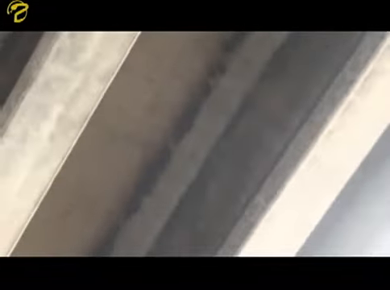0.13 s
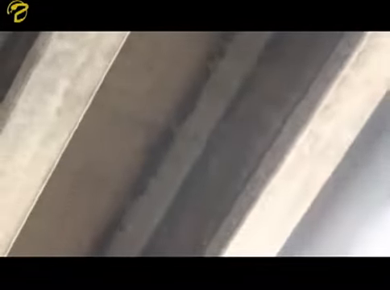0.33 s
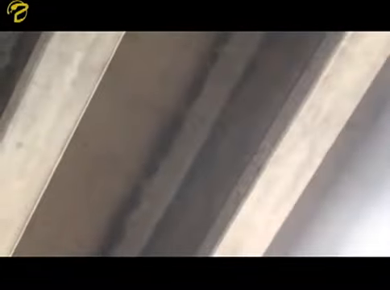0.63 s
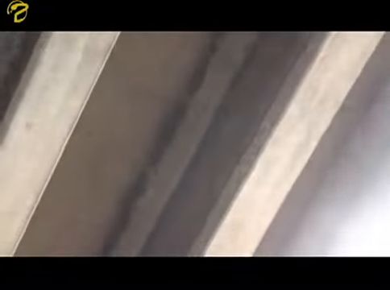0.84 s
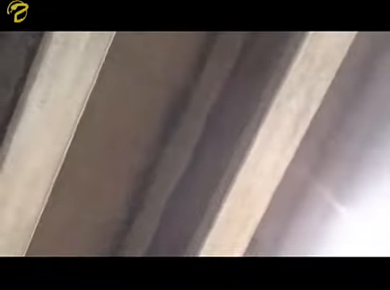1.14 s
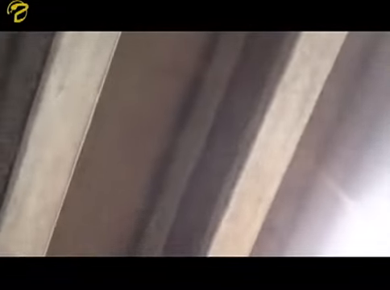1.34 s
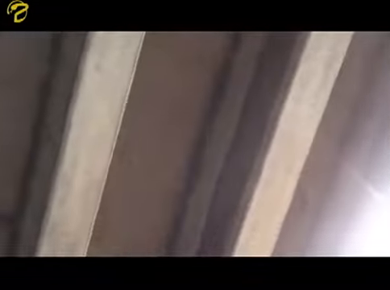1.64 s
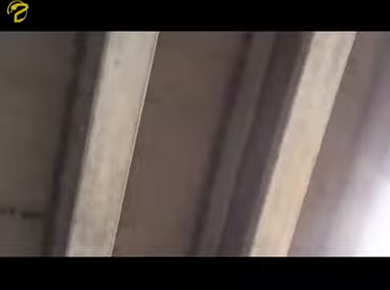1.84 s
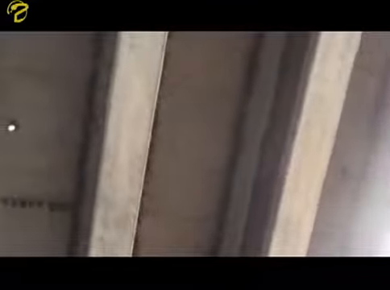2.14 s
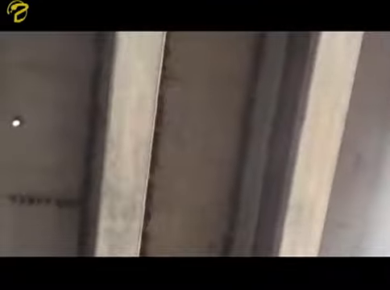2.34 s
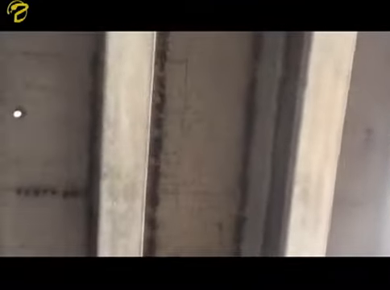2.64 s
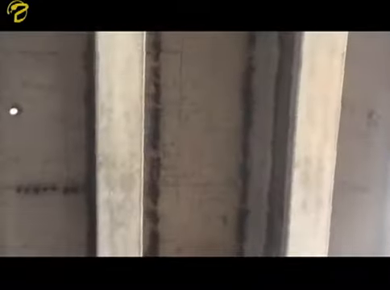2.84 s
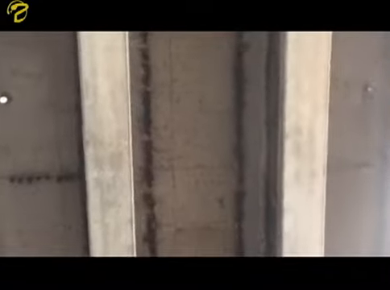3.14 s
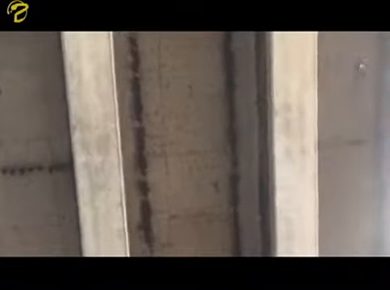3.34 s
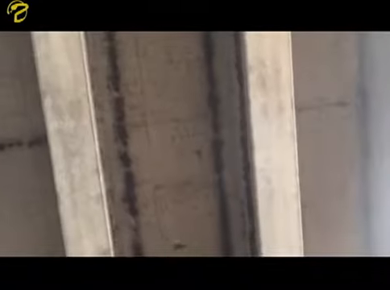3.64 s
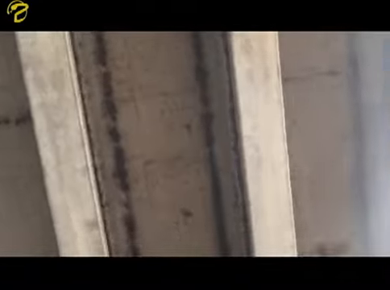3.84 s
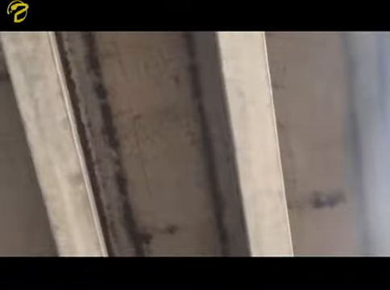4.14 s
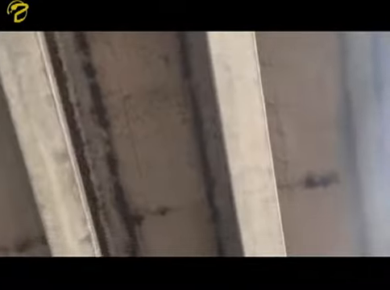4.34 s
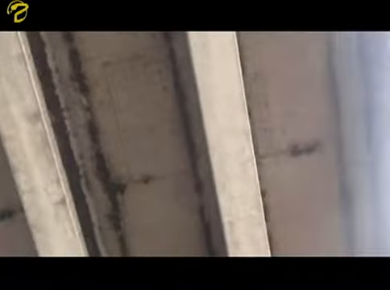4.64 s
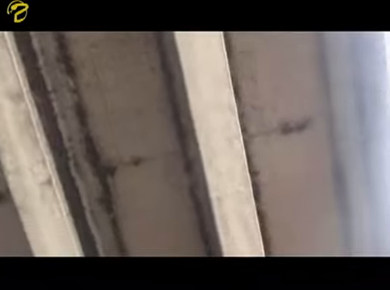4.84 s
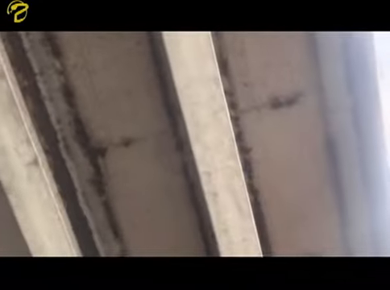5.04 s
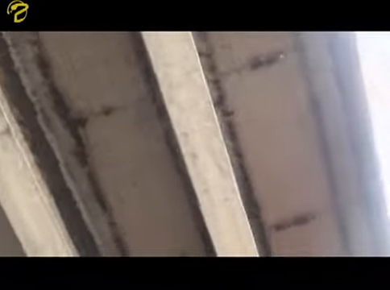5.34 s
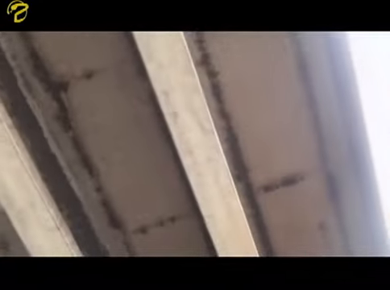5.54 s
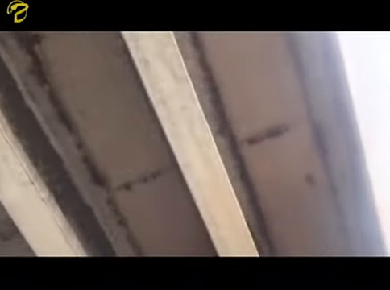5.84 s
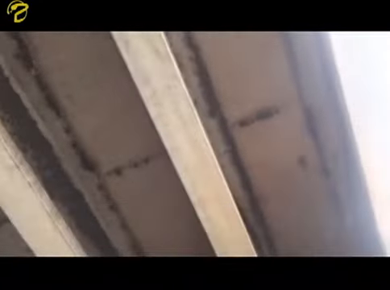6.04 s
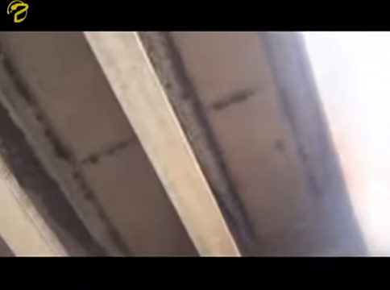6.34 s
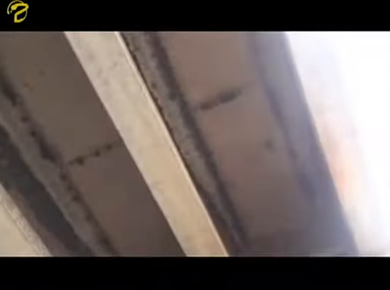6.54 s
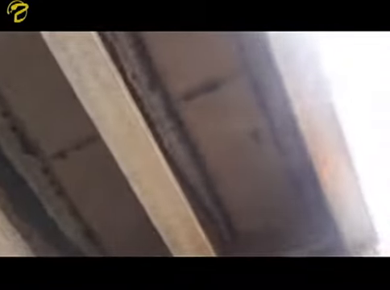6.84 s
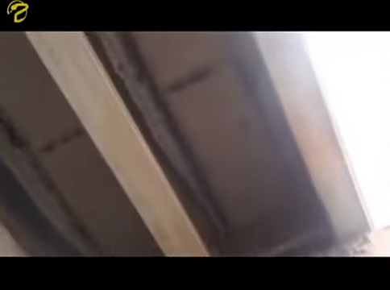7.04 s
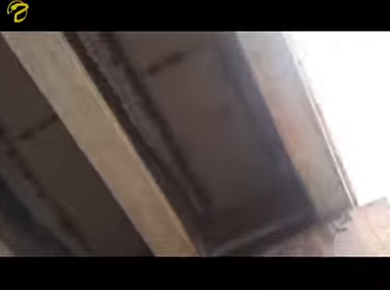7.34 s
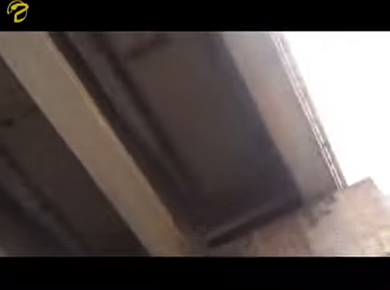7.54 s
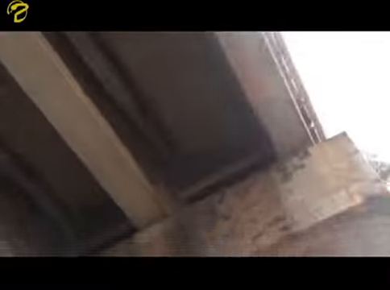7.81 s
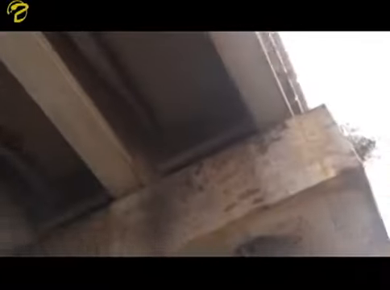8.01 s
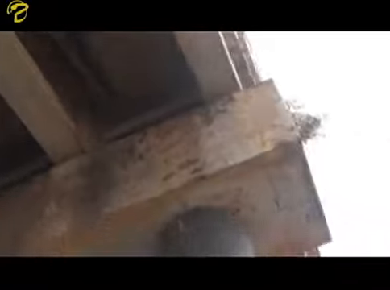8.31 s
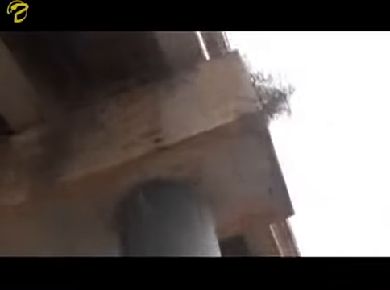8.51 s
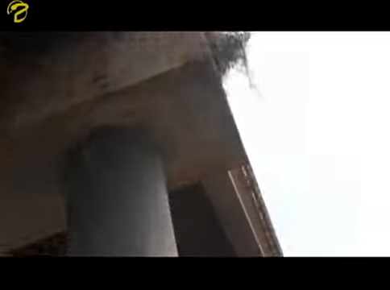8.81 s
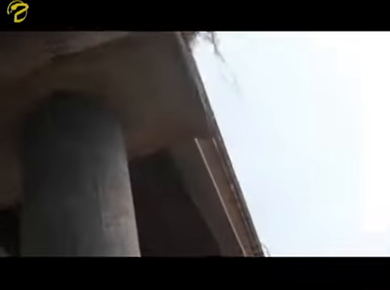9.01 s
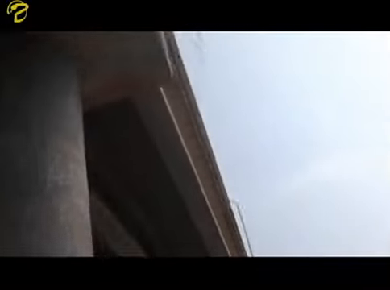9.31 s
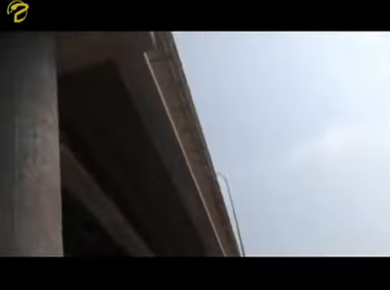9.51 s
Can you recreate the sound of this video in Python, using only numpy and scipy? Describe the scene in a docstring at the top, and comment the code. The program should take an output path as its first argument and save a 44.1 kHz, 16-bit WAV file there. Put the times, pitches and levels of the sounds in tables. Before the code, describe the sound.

Beneath a concrete road bridge, a dense bat colony twitters without pause, a shrill shimmering mass of whistles, chirps and rasps with short concrete echoes. Nearer squeaks and screeches poke out. Faint traffic rumbles and drones low underneath. After six seconds the handheld microphone gets small knocks and scuffs, while the chatter dulls and drifts slightly left.

```python
"""Bat colony under a road bridge

A large bat colony chatters in the joints of a concrete bridge, heard from below. Hundreds of gliding
whistles, rasps and chirps a second blur in the echoes between the girders; a few nearer bats stand out.
Thin peeps, probably of small birds, sound below the chatter. Traffic drones faintly through the deck
as swelling bands of noise and wavering tones. Late on, a hand knocks and scuffs on the casing: short
rings of its modes, and dull puffs of noise."""
import sys
import numpy as np
from scipy import signal
from scipy.fft import rfft, irfft, next_fast_len
from scipy.io import wavfile
from scipy.ndimage import uniform_filter1d

SR = 44100
rng = np.random.default_rng(int(sys.argv[2]) if len(sys.argv) > 2 else 0)


def unload_wav(signal):
    """Save mono or channel-first audio to the path in sys.argv[1] as 16-bit WAV at rate SR, clipped to [-1, 1]."""
    wavfile.write(
        sys.argv[1],
        SR,
        np.round(np.clip(np.atleast_2d(signal).T, -1, 1) * 32767).astype(np.int16),
    )


N = 426438

# spectrum that shapes the colony's voices: (frequency [Hz], relative level [dB per Hz])
COLONY_SPECTRUM = [(1800, -70), (2900, -10.5), (3600, -9.5), (4400, -10.5), (5000, -7), (5500, -5),
                   (6300, -4.5), (7100, -7), (9200, -1.4), (10300, -4), (11500, -9.5), (13000, -16.5),
                   (14500, -33), (16000, -25)]
# nearer squeaks, level before echoes: (middle [s], pitch [Hz], length [s], level [dB], glide [octaves])
NEAR_SQUEAKS = [(0.381, 5530, .04, -33, 0.052), (0.383, 11250, .04, -34, .04),
                (0.491, 5350, .018, -32, -.04), (.515, 5480, .03, -33, -.04), (.555, 5650, 0.018, -32, .08),
                (.692, 5200, .018, -30, .06), (.562, 5050, .04, -35, 0.027), (.915, 7360, .035, -30, 0),
                (.975, 7600, 0.038, -32, 0.0093), (1.06, 5600, .015, -34, 0),
                (1.084, 5450, 0.021, -31, -0.095), (1.105, 5200, 0.036, -32, 0.014),
                (1.136, 5360, 0.028, -32, 0.08), (1.455, 5600, 0.027, -33, -0.02),
                (2.06, 5940, .11, -34, .06), (2.13, 6350, .025, -29, -0.0073),
                (2.50, 7530, 0.029, -29, -0.032), (2.527, 6350, .035, -31, -0.017),
                (2.575, 7600, .04, -31, 0.065), (2.66, 9260, 0.032, -26, 0.012),
                (3.012, 11100, 0.068, -33, .02), (3.085, 11300, 0.12, -36, 0),
                (4.126, 6100, 0.045, -33, -0.0048), (4.138, 10300, 0.039, -33, 0.026),
                (4.38, 11300, 0.077, -38, -0.0062), (4.625, 4920, 0.039, -30, -0.044),
                (4.712, 4690, 0.043, -34, -0.012), (4.775, 4600, 0.036, -33, -.02),
                (4.835, 4640, .03, -35, -0.033), (4.931, 9800, .018, -33, 0),
                (5.13, 5350, 0.11, -34, -0.033), (5.295, 7230, .03, -28, .04),
                (5.347, 6240, .04, -33, -0.0096), (5.535, 5150, .04, -36, 0), (6.453, 11890, 0.044, -35, 0),
                (6.46, 5460, .05, -33, -0.008), (6.933, 8950, 0.035, -30, 0.011),
                (7.25, 6300, 0.04, -33, 0.02), (7.714, 5600, 0.06, -32, 0.00099),
                (7.803, 10720, 0.047, -28.5, -.02), (7.98, 10850, 0.05, -33, 0),
                (8.194, 11370, 0.066, -36, .04), (9.55, 9100, .04, -29, -0.04)]
# shrill, harsh screeches, level before echoes: (middle [s], centre [Hz], length [s], level [dB])
NEAR_SCREECHES = [(0.275, 13500, .09, -42), (0.387, 15000, .06, -44), (.68, 13200, .04, -39.5),
                  (0.712, 11300, .04, -31), (1.36, 13700, .12, -41), (1.43, 11600, 0.059, -40),
                  (2.56, 13600, .07, -39), (2.907, 6900, 0.066, -30), (3.107, 10440, .08, -32),
                  (3.15, 15200, .08, -42), (3.32, 14500, .09, -42), (5.536, 4700, .045, -34),
                  (6.434, 3800, 0.0093, -34)]
# thin, pure peeps below the chatter, probably small birds further off, level before echoes:
# (middle [s], pitch [Hz], length [s], level [dB])
PEEPS = [(0.181, 2230, .06, -43.5), (.375, 3180, 0.035, -41), (0.407, 3390, .035, -43),
         (1.866, 2425, .055, -44), (1.995, 2380, .06, -47), (5.9, 3050, 0.049, -43.5),
         (7.654, 3300, .12, -49)]
# how long the concrete girders echo: (frequency [Hz], time to fall 60 dB [s])
GIRDER_DECAY = [(300, 0.32), (3000, 0.54), (8000, 0.78), (16000, 0.18)]
# left-right likeness of the sound at each frequency: (frequency [Hz], likeness [0-1])
LEFT_RIGHT_LIKENESS = [(60, .94), (150, .92), (290, .955), (640, .92), (1400, .9), (1800, .97),
                       (2300, .998), (3300, .998), (4300, .975), (5200, .965), (9500, .93), (12000, .995),
                       (14000, .999)]
# spectrum that shapes the traffic noise: (frequency [Hz], relative level [dB per Hz])
ROAD_SPECTRUM = [(20, -34), (60, -20.5), (105, -12), (250, -7), (320, -3.5), (415, -8.5), (500, -4.5),
                 (750, -9), (950, -10.5), (1120, -10), (1400, -11), (1900, -11.5), (2700, -15), (4000, -18)]
# vehicles crossing the deck:
# (nearest [s], time to half power [s], boom [dB], rumble [dB], tyres [dB])
VEHICLE_PASSES = [(.1, 0.56, -48, -40.5, -55), (1.7, 0.8, -53.5, -39.5, -37), (3.8, 0.46, -45, -44, -37.5),
                  (4, 1.1, -60, -41.5, -34.5), (5.65, 0.19, -69, -54, -37), (9.33, 0.11, -50, -40.5, -58)]
# brief dips of the traffic noise: (middle [s], half length [s], depth [dB])
TRAFFIC_LULLS = [(0.755, 0.14, 3), (1.138, 0.067, 2), (2.087, 0.055, 7), (4.38, .04, 4),
                 (8.527, 0.037, 2.5), (9.163, .08, 2)]
# droning tones of the traffic: (pitch when loudest [Hz], width [Hz], level [dB], loudest [s],
# swell length [s], drift [Hz per s], steady share [0-1])
TRAFFIC_DRONES = [(49.3, 2, -62, 2.3, 2.2, 0, .3), (124.4, 7.8, -56.5, 4.7, 4, 0, 0.18),
                  (172, 2, -51, 4.9, 0.81, -1, .9), (211, 11, -40.5, 0.435, 0.45, -5, 0.53),
                  (203.5, 9, -50, 3.4, 1.5, 0, 0.4), (293.7, 16, -42, 1.2, 2.4, -1.5, 0.09),
                  (283, 5, -43.5, 2.5, 0.3, -17.5, 0.5), (297, 7.9, -46, 4.26, 0.36, 0, 0.4),
                  (286.5, 13, -44.5, 5.8, .4, 0, 0.2), (309, 6, -43.5, 0.075, 0.4, -3.5, .6),
                  (316, 6, -39.5, 1.4, 0.34, -0.5, 0.4), (319.6, 7, -44, 3.9, 0.22, -20, 0.3),
                  (317.2, 36, -44.5, 7.1, 2.5, 0, 0), (372, 8, -43, 0.12, 0.22, 5, 0.3),
                  (356.6, 6.3, -45, 1.7, 0.68, 0.5, 0.4), (348.6, 11, -44.5, 4.2, 2, -1, .2),
                  (451, 6, -46.5, 1.8, 1.3, 2.5, 0.64), (460, 6.3, -41, 3.91, 0.47, 0, 0.9),
                  (474, 6.1, -40, 4.8, 0.18, 0.5, 0.5), (465, 15, -42.5, 6.06, 0.42, 0.5, 0.3),
                  (526, 20, -48, 3.8, 2.3, 0, 0.37), (552, 8, -44.5, 3.17, 0.28, -0.5, 0.6),
                  (580, 6.5, -45, 1.61, 0.16, 0, .6), (660, 9.3, -51, 3.9, 0.89, 6, 0.1),
                  (1104, 30, -48.5, 3, 1.1, 10.5, 0.08), (1114, 240, -43.5, 0.12, 0.75, -0.5, 0.03)]
# modes that the hand-held casing rings with: (frequency [Hz], level [dB], time to fall 60 dB [s])
CASING_MODES = [(166, -18, 0.053), (396, -16, .045), (530, -3, 0.043), (770, -5, 0.027), (1240, -12, .025),
                (1520, 1, .018), (2295, -3, 0.022), (3000, -3, 0.02)]
# finger knocks, level before the casing's band limits:
# (time [s], peak level [dB], softness of the touch as contact time [s])
FINGER_KNOCKS = [(6.3225, -19, 0.00032), (6.3245, -24, 0.00025), (6.3612, -19, .00003),
                 (6.3647, -20, 0.00046), (6.3705, -13, 0.00009), (6.3734, -12, 0.000059),
                 (6.3773, -22, 0.00019), (6.38, -23, 0.000063), (7.842, -34, .00012), (8.3202, -22, 0.0001),
                 (8.341, -21, .00005), (8.346, -26, 0.00027), (8.351, -32, 0.00023), (8.927, -31, 0.00036),
                 (8.95, -24, .00004), (8.976, -31, .0001), (8.997, -26, 0.00014), (9.028, -28, 0.00037)]
# scuffs and soft bumps of the hand, level before the treble is dulled:
# (time of peak [s], peak level [dB], rise [s], decay [s], centre [Hz], width [octaves])
HAND_BUMPS = [(6.324, -28, .002, 0.0069, 520, 0.18), (6.345, -34.5, 0.015, 0.069, 660, 1),
              (6.376, -26, 0.0025, 0.0076, 520, 0.47), (6.39, -32, 0.016, 0.014, 170, 0.38),
              (6.435, -33, 0.021, 0.02, 1890, 0.64), (7.26, -35, 0.025, 0.047, 328, 0.77),
              (7.734, -35, .004, 0.0064, 333, 0.37), (7.85, -34.5, 0.0049, 0.051, 656, 1.5),
              (8.321, -32, 0.004, 0.011, 760, 0.3), (8.345, -38, .014, 0.0074, 1800, 0.56),
              (8.349, -30, 0.0034, 0.0058, 517, 0.45), (8.935, -33, .012, 0.03, 460, 0.35),
              (8.942, -39, 0.011, .015, 1800, .5), (8.99, -35.5, 0.03, 0.032, 676, 0.32),
              (9.045, -33, 0.017, 0.025, 310, 0.47)]

# the colony: roosts and calls from each, then twittering bats and runs from each
ROOST_COUNT, CALL_COUNT = 4, 1700
TWITTER_COUNT, RUN_COUNT, CHIRPS_PER_RUN = 56, 30, 5
LOW_HZ, HIGH_HZ = 3100, 15200  # range of the roosts' calls
FULL_VOICE_HZ = 4300  # calls below this pitch are weak
ROOST_WET_DB, NEAR_WET_DB = -1.5, -10  # echoes against direct calls
TWITTER_DB, FAR_DB = -4.5, -6.5  # twitter against the roosts' calls, far blur before shaping
SCREECH_RASP = 1.9  # sharpness of a screech's pulses, per kHz of its pitch

# the chatter is steady, and fades once the microphone points out from under the deck
CHATTER_DB, AWAY_S, AWAY_DB_PER_S = -23.5, 7.45, 0.87
# from the turn on the colony drifts to the left and its highest treble dulls
TURN_S, TURN_DB_PER_S = 2.9, .39
TOP_HZ, TOP_DB, TOP_DB_PER_S = 12100, 0.5, 1.1

BOOM_DB, RUMBLE_DB, TYRES_DB = -55, -47, -35  # distant traffic, always there
SURGE_DB, SURGE_HZ = .5, 9.1  # random unevenness of the traffic
CASING_LOW_HZ, CASING_TOP_HZ = 130, 3500  # the casing radiates little outside this range
BUMP_TOP_HZ = 3120  # the bumps are dull above this
EDGE_HZ = 15850  # upper edge of the recorder's band


def gain_of(db):
    """Decibels to amplitude."""
    return 10 ** (np.asarray(db) / 20)


def evened(x):
    """Scales to rms 1."""
    return x / np.sqrt(np.mean(x ** 2) + 1e-20)


def read(points, hz):
    """Reads a curve between its points on a log-frequency axis."""
    f, value = np.transpose(points)
    return np.interp(np.log(hz + 1), np.log(f + 1), value)


def add(mix, s, sound):
    """Mixes a sound in at s seconds."""
    part = mix[max(round(s * SR), 0):][:len(sound)]
    part += sound[:len(part)]


def colour(x, shape):
    """Filters by a gain that is a function of frequency."""
    size = next_fast_len(x.shape[-1])
    gain = shape(np.fft.rfftfreq(size, 1 / SR))
    return irfft(rfft(x, size) * gain, size)[..., :x.shape[-1]]


def split(x, hz):
    """The parts below and above a frequency."""
    low = colour(x, lambda f: 1 / (1 + (f / hz) ** 8))
    return low, x - low


def left_right(pair):
    """Two unrelated signals become a nearly alike left and right."""
    def likeness(f):
        return np.clip(read(LEFT_RIGHT_LIKENESS, f), 0, .999)

    mid = colour(pair[0], lambda f: np.sqrt((1 + likeness(f)) / 2))
    side = colour(pair[1], lambda f: np.sqrt((1 - likeness(f)) / 2))
    return np.array([mid + side, mid - side])


def girders(x, wet_db):
    """Direct sound plus dense concrete reflections, decaying at a rate set for each frequency."""
    noise = rng.standard_normal((2, SR // 2))
    hz, t, z = signal.stft(noise, SR, nperseg=256)
    decay = gain_of(-60 * t / read(GIRDER_DECAY, hz)[:, None])
    tail = signal.istft(z * decay, SR, nperseg=256)[1]
    tail = tail / np.linalg.norm(tail[0])
    wet = signal.fftconvolve(x[None], tail, axes=1)[:, :N]
    wet_gain = gain_of(wet_db)
    centre = (x + wet_gain * wet[0]) / np.hypot(1, wet_gain)
    return left_right([centre, wet[1]])


def patchy(x, depth_db, seconds, span_hz):
    """Random patches of time and frequency swell and sink."""
    size, hop = 512, 128
    z = signal.stft(x, SR, nperseg=size, noverlap=size - hop)[2]
    field = rng.standard_normal(z.shape[1:])
    for axis, extent in enumerate([span_hz * size / SR, seconds * SR / hop]):
        field = uniform_filter1d(field, max(round(extent), 1), axis)
    z = z * gain_of(depth_db * evened(field))
    return signal.istft(z, SR, nperseg=size, noverlap=size - hop)[1][:, :N]


def squeak(hz, length, glide, arch, rasp, buzz_hz, jitter=0.012):
    """One call: a thin arched whistle (bends in octaves), chopped into pulses as it turns raspy."""
    u = np.linspace(-1, 1, max(int(length * SR), 64))
    waver = np.interp(u, np.linspace(-1, 1, 24), rng.standard_normal(24))
    pitch = hz * 2 ** (glide * u / 2 - arch * u ** 2 + jitter * waver)
    whistle = np.sin(2 * np.pi * np.cumsum(pitch) / SR)
    beat = np.cumsum(buzz_hz * pitch / hz) / SR % 1  # the pulse rate follows the pitch
    pulses = np.exp(-rasp * beat) * np.sin(np.pi * beat) ** min(abs(rasp), 1)
    return evened(whistle * pulses * np.sqrt(1 - u ** 2))


def colony():
    """Each roost has its own echoes; chirps twitter on top, and the farthest bats are a restless blur."""
    calls = evened(sum(girders(roost(), ROOST_WET_DB) for _ in range(ROOST_COUNT)))
    calls = calls + gain_of(TWITTER_DB) * evened(girders(twitter(), ROOST_WET_DB))
    hiss = left_right(rng.standard_normal((2, N)))
    far = evened(patchy(hiss, depth_db=2.5, seconds=0.012, span_hz=2500))
    voices = colour(calls + gain_of(FAR_DB) * far, lambda f: gain_of(read(COLONY_SPECTRUM, f)))
    away_db = AWAY_DB_PER_S * np.maximum(np.arange(N) / SR - AWAY_S, 0)
    return gain_of(CHATTER_DB - away_db) * evened(voices)


def roost(shortest=0.009, longest=.034, glide=0.1988, arch=0.1023, rasp=24.6):
    """The bats of one joint call in turn, each pitched well away from the last; most whistle, some rasp."""
    out = np.zeros(N)
    draws = rng.random((CALL_COUNT, 7))
    pitches = np.cumsum(.3 + .16 * draws[:, 0]) % 1  # large steps, wrapping round the range
    for turn, (high, draw) in enumerate(zip(pitches, draws[:, 1:])):
        when, long, slope, bow, harsh, buzz = draw
        hz = LOW_HZ + (HIGH_HZ - LOW_HZ) * high ** 1.1
        length = shortest + (longest - shortest) * long
        voice = min((hz - LOW_HZ) / (FULL_VOICE_HZ - LOW_HZ), 1)
        call_rasp = rasp * (harsh < .3)
        call = squeak(hz, length, glide * (2 * slope - 1.2), arch * bow, call_rasp, 110 + 260 * buzz)
        middle = (turn + when) / CALL_COUNT * N / SR
        add(out, middle - length / 2, voice * call / np.sqrt(length))  # equal energy at any length
    return evened(out)


def twitter(shortest=0.00301, longest=0.00882, sweep=0.516, slowest_hz=35, fastest_hz=110):
    """Each bat fires quick runs of steep chirps, most of them falling; a run swells and dies away."""
    out, beats = np.zeros(N), np.arange(CHIRPS_PER_RUN)
    swell = np.sin(np.pi * (beats + 1) / (CHIRPS_PER_RUN + 1))
    for bat, (long, slope, pace) in enumerate(rng.random((TWITTER_COUNT, 3))):
        hz = 4800 + 7500 * ((bat + .5) / TWITTER_COUNT) ** 1.3
        length = shortest + (longest - shortest) * long
        direction = 1 if slope < .3 else -1
        glide = sweep * (.6 + .4 * pace) * direction
        chirp = squeak(hz, length, glide, arch=0.058, rasp=0, buzz_hz=0) / np.sqrt(length)
        rate_hz = slowest_hz + (fastest_hz - slowest_hz) * pace
        run_times = (np.arange(RUN_COUNT) + rng.random(RUN_COUNT)) / RUN_COUNT * N / SR
        for s in run_times:
            times = s + (beats - 2 + .2 * rng.random(CHIRPS_PER_RUN)) / rate_hz
            for at, size in zip(times, swell):
                add(out, at, size * chirp)
    return evened(out)


def traffic():
    """Boom and rumble of the deck and the uneven rush of tyres swell as each vehicle nears."""
    noise = left_right(rng.standard_normal((2, N)))
    rush = patchy(noise, depth_db=1.35, seconds=0.054, span_hz=700)
    deck, tyres = split(colour(rush, lambda f: gain_of(read(ROAD_SPECTRUM, f))), 432)
    boom, rumble = split(deck, 160)
    t = np.arange(N) / SR
    power = gain_of([BOOM_DB, RUMBLE_DB, TYRES_DB])[:, None] ** 2
    for s, half, *levels_db in VEHICLE_PASSES:
        nearness = 1 / (1 + ((t - s) / half) ** 2)
        power = power + gain_of(levels_db)[:, None] ** 2 * nearness
    road = sum(evened(band) * np.sqrt(p) for band, p in zip([boom, rumble, tyres], power))
    lull_db = sum(db * np.exp(-((t - s) / half) ** 2) for s, half, db in TRAFFIC_LULLS)
    surge = gain_of(SURGE_DB * wander(SURGE_HZ))
    return (road * gain_of(-lull_db) + drones()) * surge


def drones():
    """Engine and tyre tones, part steady and part wavering, swell, drift in pitch and fade."""
    step = 10  # computed at a tenth of the sample rate
    t = np.arange(next_fast_len(N // step + 1)) * step / SR
    out, spread = np.zeros(len(t), complex), np.fft.fftfreq(len(t), t[1])
    for hz, width, db, s, length, drift, steady in TRAFFIC_DRONES:
        noise = rng.standard_normal((len(t), 2)) @ [1, 1j]
        wobble = np.fft.ifft(np.fft.fft(noise) / (1 + (spread / width) ** 2))
        share = np.clip(steady, 0, 1)
        waver = np.sqrt(share) + np.sqrt(1 - share) * wobble / wobble.std()
        turns = np.cumsum(hz + drift * (t - s)) * t[1]
        swell = np.exp(-((t - s) / length) ** 2 / 2)
        out += gain_of(db) * np.sqrt(2) * waver * np.exp(2j * np.pi * turns) * swell
    # the real and imaginary parts serve as the pair of signals
    return left_right(signal.resample_poly([out.real, out.imag], step, 1, axis=1)[:, :N])


def wander(top_hz):
    """A slow random drift of rms 1."""
    noise = rng.standard_normal(N)
    return evened(colour(noise, lambda f: (f / top_hz) / (1 + (f / top_hz) ** 4)))


def single_calls():
    """Pure peeps, and the squeaks and pulsed screeches of nearer bats, with weaker girder echoes."""
    out = np.zeros(N)
    for s, hz, length, db in PEEPS:
        call = squeak(hz, length, glide=0, arch=0.012, rasp=0, buzz_hz=0, jitter=.005)
        add(out, s - length / 2, gain_of(db) * call)
    for s, hz, length, db in NEAR_SCREECHES:
        rasp = SCREECH_RASP * hz / 1000
        call = squeak(hz, length, glide=0, arch=0.041, rasp=rasp, buzz_hz=327, jitter=0.076)
        add(out, s - length / 2, gain_of(db) * call)
    for s, hz, length, db, glide in NEAR_SQUEAKS:
        call = squeak(hz, length, glide, arch=0.025, rasp=0.83, buzz_hz=184, jitter=0.0204)
        add(out, s - length / 2, gain_of(db) * call)
    return girders(out, NEAR_WET_DB)


def knocks():
    """Each touch rings the casing briefly; a soft one reaches only its low modes."""
    out, t = np.zeros(N), np.arange(SR // 10) / SR
    ring = sum(gain_of(db - 60 * t / t60) * np.cos(2 * np.pi * hz * t) for hz, db, t60 in CASING_MODES)
    for s, db, contact in FINGER_KNOCKS:
        touch = t * np.exp(-t / contact)
        knock = signal.fftconvolve(ring, touch)[:len(t)]
        add(out, s, gain_of(db) * knock / abs(knock).max())
    return split(split(out, CASING_LOW_HZ)[1], CASING_TOP_HZ)[0]


def bumps():
    """Dull, dry bumps and scuffs: bands of noise that rise and die away with no ring."""
    out, t = np.zeros(N), np.arange(SR // 2) / SR - .1  # time from the peak
    for s, db, rise, decay, hz, octaves in HAND_BUMPS:
        noise = rng.standard_normal(len(t))
        rub = colour(noise, lambda f: np.exp(-(np.log2((f + 1) / hz) / octaves) ** 2 / 2))
        push = np.exp(-np.maximum(-t / rise, t / decay))
        bump = evened(rub * push) * np.sqrt(np.mean(push ** 2))
        add(out, s + t[0], gain_of(db) * bump)
    return split(out, BUMP_TOP_HZ)[0]


def scene():
    """The shrill chatter dulls and drifts leftward as the microphone turns; the low sounds stay central."""
    turned_s = np.maximum(np.arange(N) / SR - TURN_S, 0)
    side_db = TURN_DB_PER_S * turned_s / 2  # up on the left, down on the right
    body, top = split(colony(), TOP_HZ)
    voices = body + top * gain_of(TOP_DB - TOP_DB_PER_S * turned_s) + single_calls()
    low, shrill = split(voices, 5100)
    turned_voices = low + shrill * gain_of([side_db, -side_db])
    return turned_voices + traffic() + knocks() + bumps()


def record(dry):
    """The recorder's band limit: a steep low-pass filter."""
    low_pass = signal.firwin(511, EDGE_HZ, window=("kaiser", 9), fs=SR)
    return signal.oaconvolve(dry, low_pass[None], "same")


dry = scene()
out = record(dry)
unload_wav(out)
```